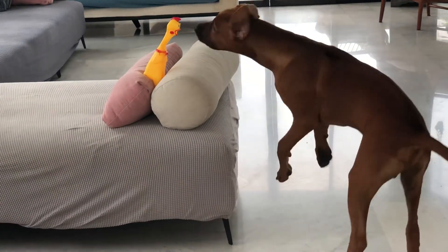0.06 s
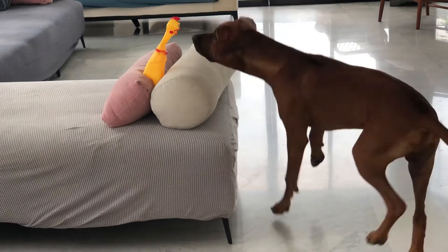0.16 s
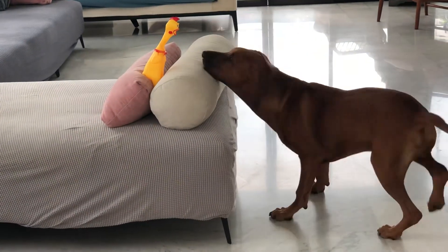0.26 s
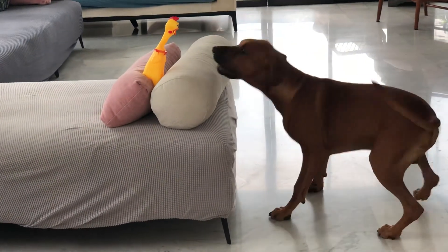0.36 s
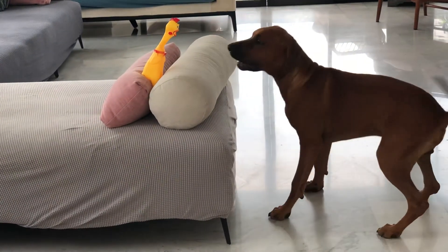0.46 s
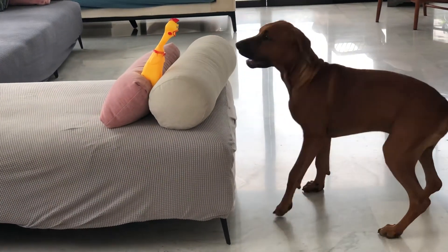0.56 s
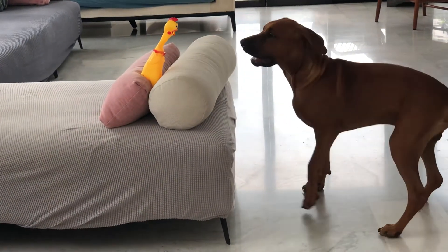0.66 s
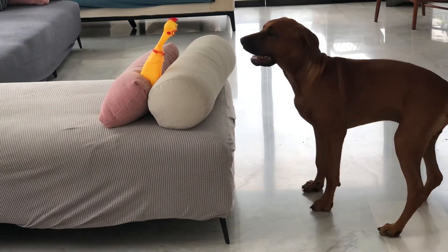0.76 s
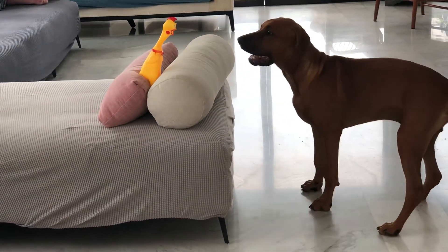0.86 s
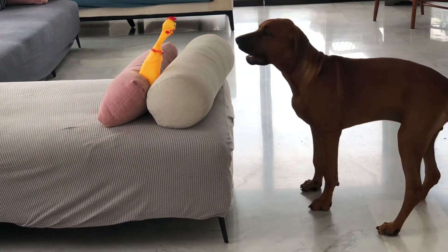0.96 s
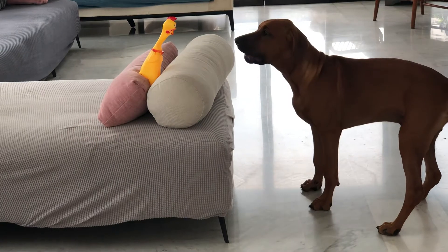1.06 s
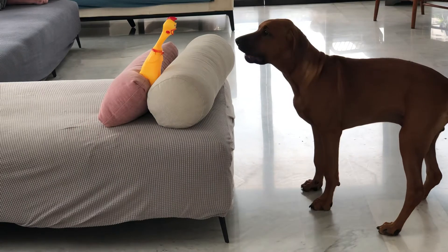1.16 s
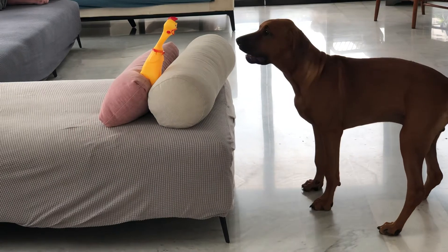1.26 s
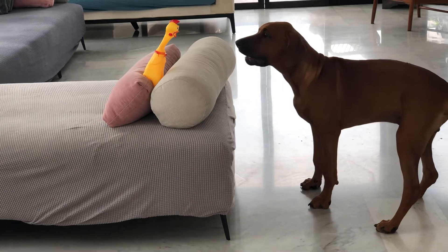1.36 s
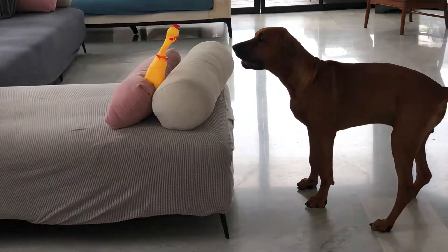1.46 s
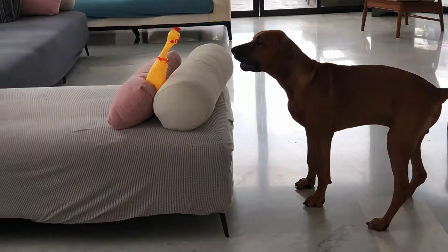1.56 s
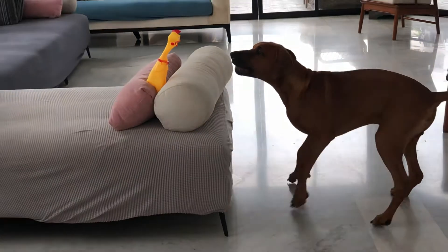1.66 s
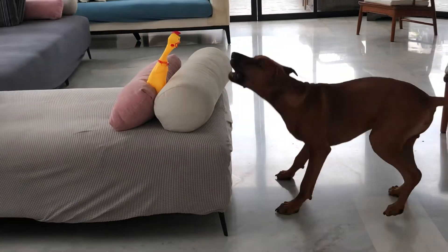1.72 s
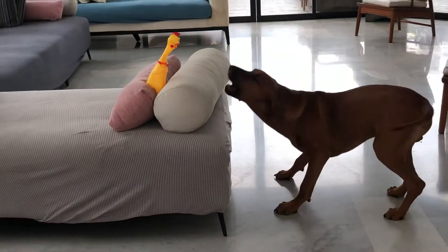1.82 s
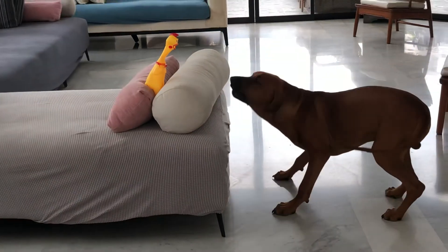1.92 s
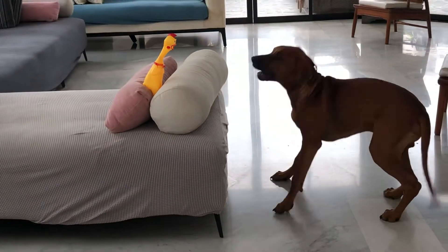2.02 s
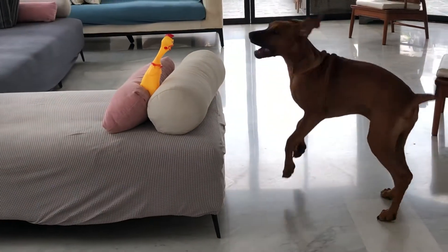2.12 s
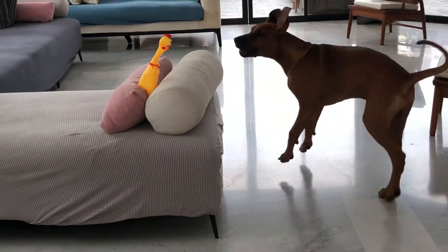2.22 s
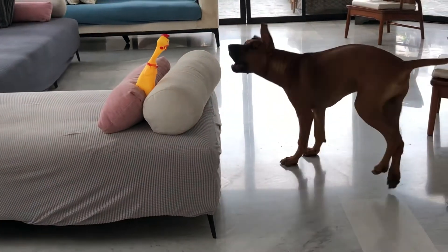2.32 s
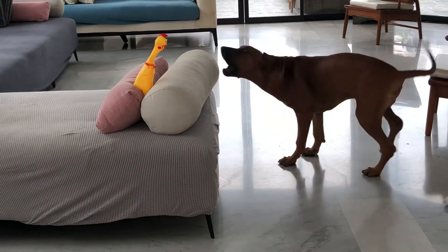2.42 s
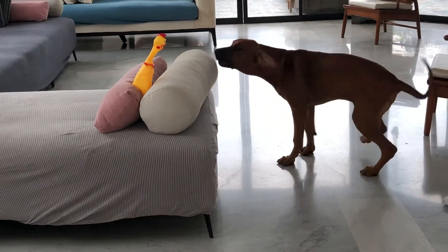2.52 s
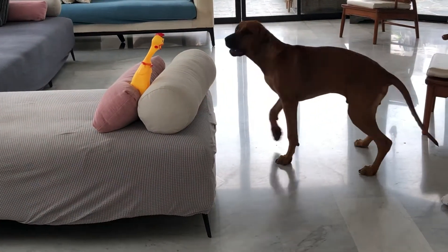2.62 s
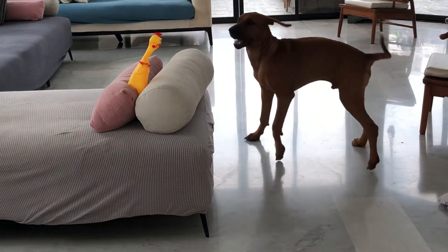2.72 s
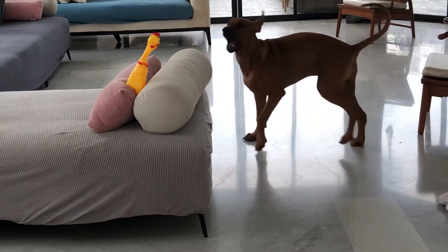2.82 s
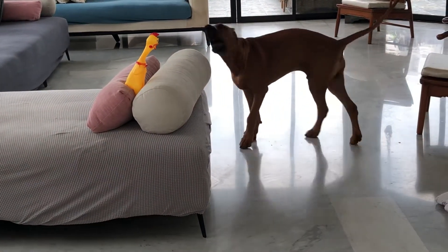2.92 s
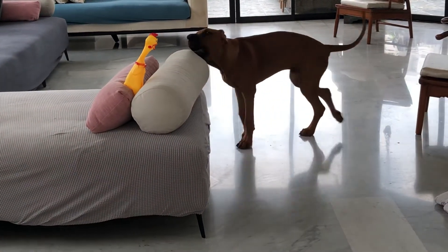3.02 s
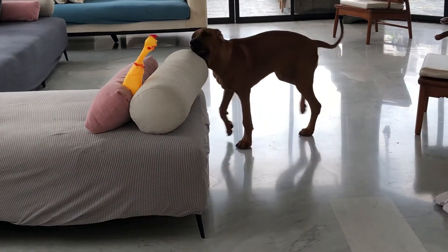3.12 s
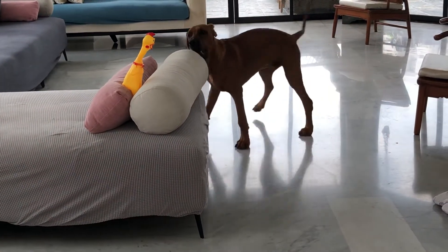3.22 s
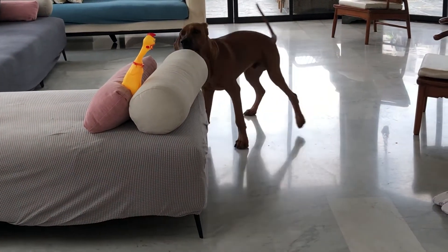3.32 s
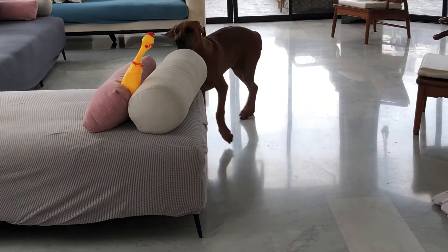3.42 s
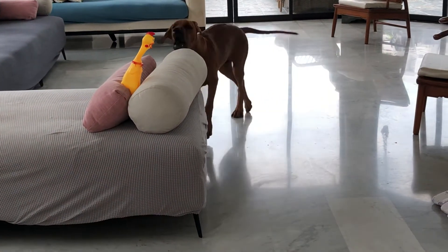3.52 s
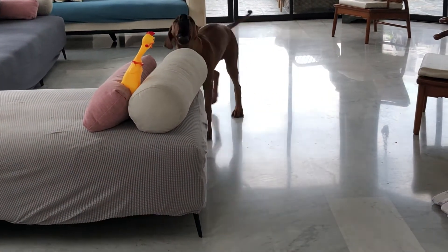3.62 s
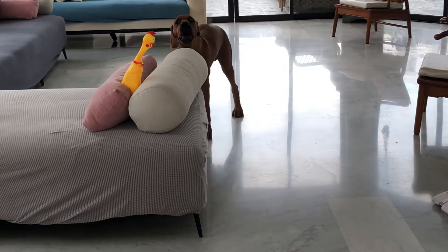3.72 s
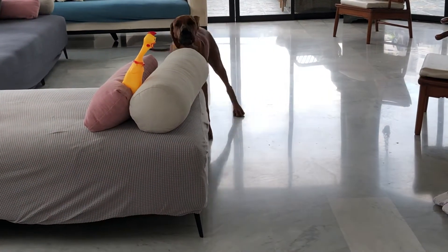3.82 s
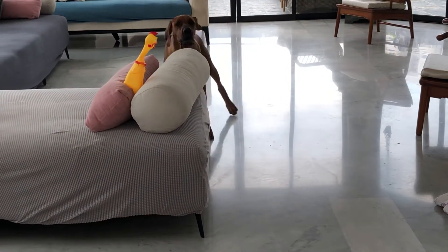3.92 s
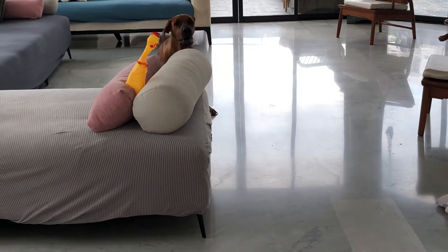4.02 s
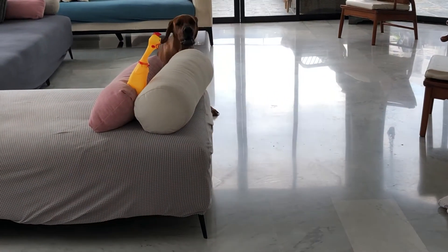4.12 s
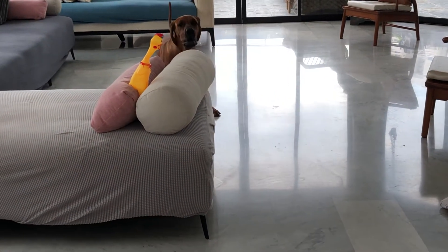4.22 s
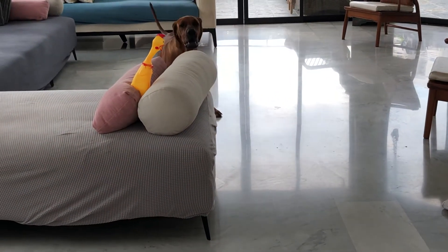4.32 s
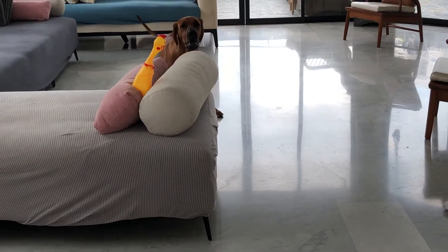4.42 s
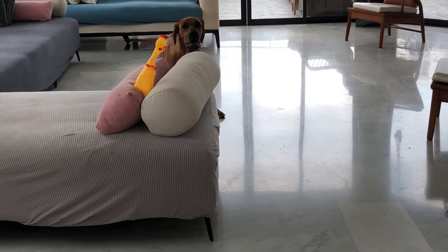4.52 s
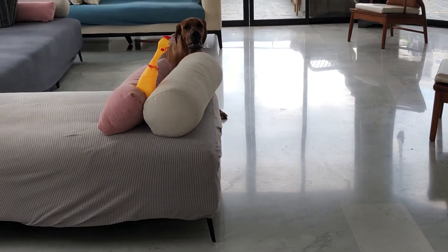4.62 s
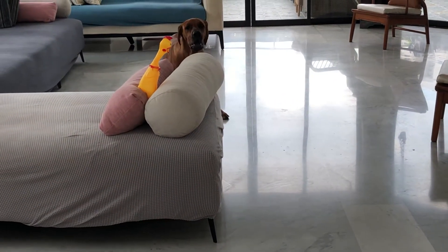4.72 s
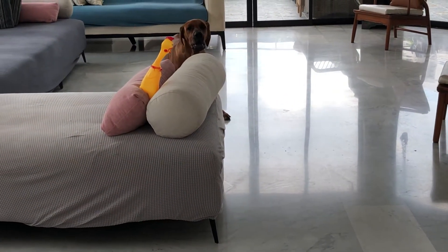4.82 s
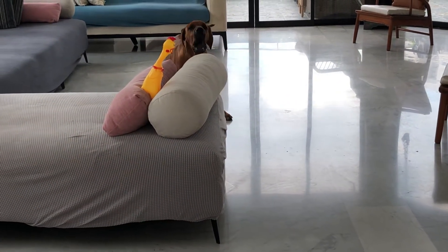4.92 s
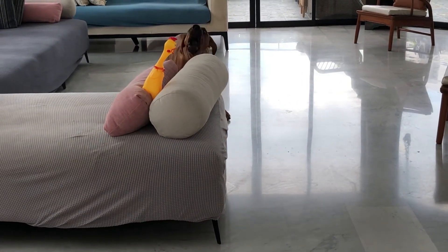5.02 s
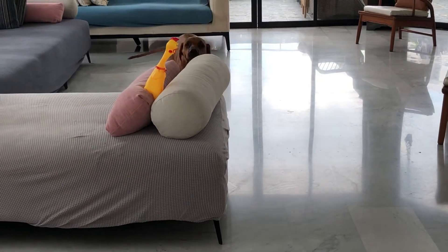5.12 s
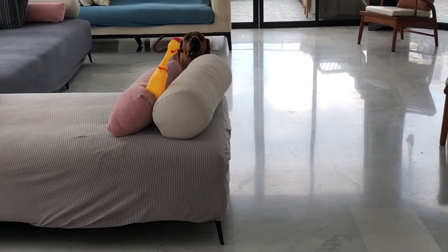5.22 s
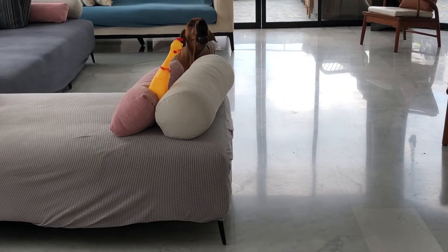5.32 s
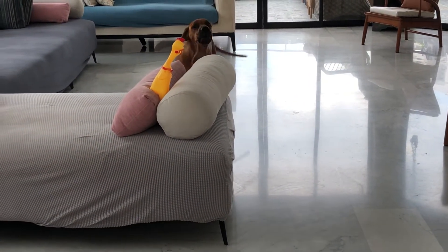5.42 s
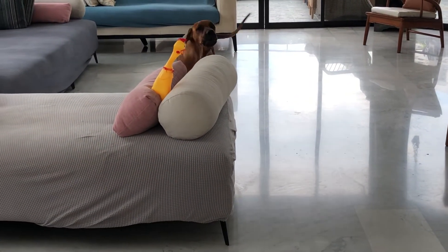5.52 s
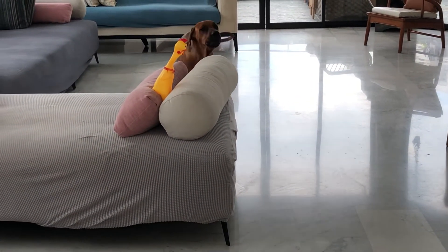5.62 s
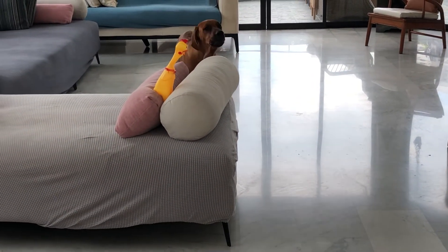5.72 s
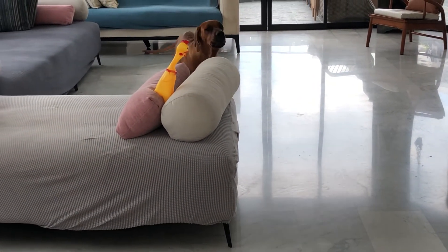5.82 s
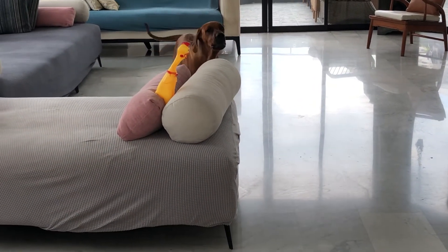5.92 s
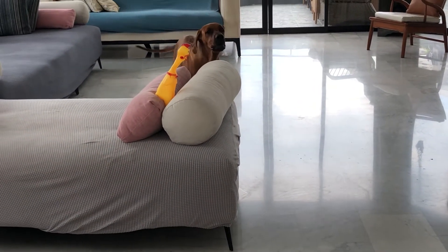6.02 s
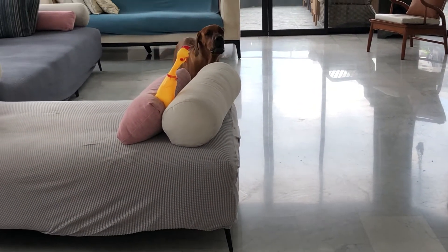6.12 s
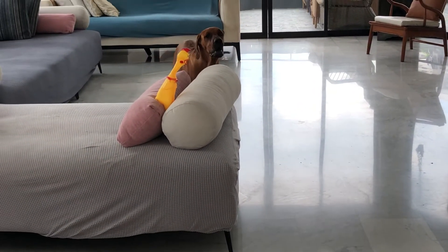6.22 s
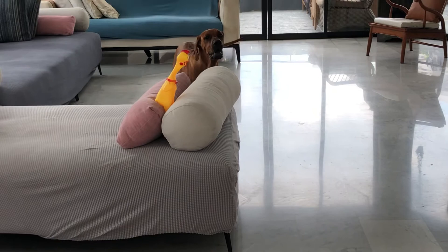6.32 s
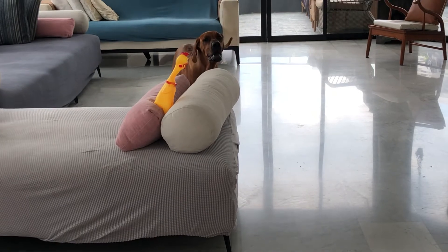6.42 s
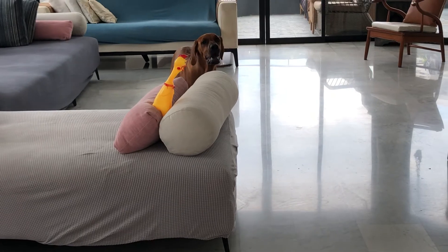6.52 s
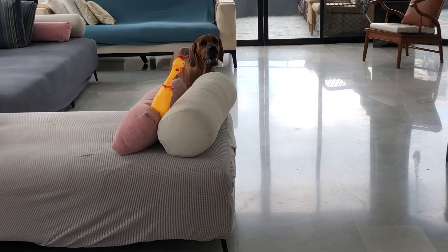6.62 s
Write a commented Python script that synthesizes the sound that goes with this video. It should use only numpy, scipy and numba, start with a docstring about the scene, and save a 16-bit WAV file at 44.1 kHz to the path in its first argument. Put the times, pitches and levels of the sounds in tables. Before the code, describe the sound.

Six loud, rough barks from a big dog ring through a room, after a faint whine and light claw clicks.

```python
"""A large dog barks six times in a living room with a bare stone floor.
Each bark follows the source-filter principle: rough glottal pulses and rushing air, arching in pitch,
excite the resonances of throat and mouth. The dog whines faintly first, and its claws tick as it hops.
The room reverberates for almost a second over the soft rumble of the house,
and a phone's gain control and limiter flatten the loud peaks."""
import sys
import numpy as np
from scipy import signal
from scipy.fft import rfft, irfft, next_fast_len
from scipy.io import wavfile
from scipy.ndimage import uniform_filter1d, minimum_filter1d
from numba import njit

SR = 44100
rng = np.random.default_rng(int(sys.argv[2]) if len(sys.argv) > 2 else 0)


def wav_record(signal):
    """Record a signal, one row per channel, as 16-bit PCM in the file named by sys.argv[1]."""
    frames = np.transpose(np.atleast_2d(signal))
    bounded = np.clip(frames, -1, 1)
    # unit amplitude maps onto the largest positive 16-bit level
    quanta = np.round(bounded * 32767).astype(np.int16)
    wavfile.write(sys.argv[1], SR, quanta)


N = 293706
T = np.arange(N) / SR

# spectral density of the house rumble: frequency_hz, relative_db
RUMBLE_SPECTRUM = [(15, -34), (25, -15.5), (91, -3), (156, -5), (193, -3.5), (227, -5), (281, -7),
                   (349, -6), (410, -12), (469, -7.5), (523, -15), (567, -11), (666, -16), (970, -13.5),
                   (15500, -52.5)]
# reverberation time of the room: frequency_hz, t60_s
ROOM_DECAY = [(150, 1), (400, 0.78), (1000, 0.84), (2200, 0.81), (5000, 0.8), (8000, 0.5), (14000, 0.3)]
# standing waves of the room: frequency_hz, relative_db, t60_s
ROOM_MODES = [(290, -41, 0.92), (422, -8.5, 0.63), (499.4, -8, 0.92), (805, -15, 1.11), (897, -25, 0.2),
              (1232, -19.5, 1.1), (1710, -20, 0.5)]
# claw impacts on stone: start_s, relative_peak_db, ring_hz, scuff_decay_s
CLAW_IMPACTS = [(0.066, -26.5, 5660, 0.00073), (.163, -43, 12000, .003), (.182, -45, 12000, .004),
                (0.199, -35, 6340, 0.0048), (.218, -41, 13000, 0.01), (0.275, -38, 8500, 0.0024),
                (.553, -39.5, 5370, 0.0037), (1.643, -42, 12000, .002), (1.651, -33.5, 5800, 0.0025),
                (1.658, -37.5, 5200, 0.023), (2.026, -39.5, 10100, 0.023), (2.061, -34.5, 8600, 0.05),
                (2.109, -37, 8850, 0.018), (2.329, -37, 6320, 0.014), (3.968, -41, 9140, 0.01),
                (3.989, -35, 8000, 0.033)]
# response of the nasal passage: frequency_hz, gain_db
NASAL_RESPONSE = [(600, -15), (1250, 7.5), (1900, 4), (2500, -8), (3200, -2), (4400, -2.5), (5700, -9),
                  (8500, -20), (12000, -37)]
# rasp of air past the teeth: frequency_hz, gain_db
RASP_SPECTRUM = [(1500, -10), (2550, -7), (3300, 0), (3700, -5), (3950, 4), (4400, -6), (5050, 2),
                 (5500, -4), (5950, 3), (6500, -4), (7200, -4), (8000, -10), (11000, -9), (15500, -15)]
# one row per bark: start_s, length_s, attack_s, effort_db, sag_db, opening_hz, top_hz, leap_at_s,
# rasp_db, chest_db, muffle_db
BARKS = [ (1.695, .200, 0.046, -2, 6.3, 266.1, 432.4, .036, -18.5, -11.5, 17.5),
         (2.351, 0.19, 0.03, -1, 12.8, 280.4, 441, .045, -18.5, -23.5, 4.5),
         (2.922, .190, 0.042, -4, 9.5, 255.9, 422.4, 0.042, -20.5, -22, 4.1),
         (3.565, .220, 0.065, -2.5, 11.7, 240.2, 417.7, .080, -16, -20.5, 1.4),
         (4.934, .195, 0.022, -3, 5.1, 265.1, 402.5, .050, -18.5, -22, 4.2),
         (5.234, 0.16, 0.029, -5.5, 7.2, 252.3, 372.2, 0.075, -18.5, -19.5, 4.2), ]
# four vocal tract resonances per bark, each: centre_hz, level_db
FORMANTS = [
    [(460, -3), (700, 2), (1110, -3), (1930, -14)],
    [(480, -0.5), (810, 3), (1500, -2.5), (2130, -10.5)],
    [(480, 0), (730, 1), (1340, -8), (2080, -10)],
    [(460, -1), (780, 2), (1330, -5), (2060, -10)],
    [(460, -1), (780, 1), (1200, -6), (2090, -13)],
    [(480, 2.5), (730, 0), (1160, -3), (2050, -17)],
]
# one entry per formant: stage_width_hz
FORMANT_WIDTHS = [190, 220, 310, 250]
# voice quality per bark, as fractions: rough_start, rough_end, alternate_loss, mouth_rise
VOICE_QUALITIES = [(.22, .38, .2, .13), (.14, .55, .25, -.03), (.25, .42, .2, .1), (.58, .6, .35, .08),
                   (.42, .33, .3, .16), (.38, .7, .4, .17)]

RELEASE_S = 0.0426  # the end of each bark, where effort and pitch give out


def undb(db):
    """Amplitude ratio of a level in decibels."""
    return 10 ** (np.asarray(db) / 20)


def unit(x):
    """Normalisation to an rms of 1."""
    return x / np.sqrt(np.mean(x ** 2) + 1e-18)


def along(hz, points):
    """Interpolation of (frequency_hz, value) points on a logarithmic frequency axis."""
    point_hz, value = np.transpose(points)
    return np.interp(np.log(hz + 1e-9), np.log(point_hz), value)


def colour(x, points):
    """Spectral filtering by a curve of (frequency_hz, gain_db) points."""
    size = next_fast_len(len(x))
    gain = undb(along(np.fft.rfftfreq(size, 1 / SR), points))
    return irfft(rfft(x, size) * gain, size)[:len(x)]


def wander(t, rate_hz):
    """Random modulation: straight lines between Gaussian values of unit spread."""
    knots = rng.standard_normal(4096)
    return np.interp((t - t[0]) * rate_hz, np.arange(len(knots)), knots)


@njit
def bandpass(x, hz, width_hz):
    """Second-order state-variable resonator with unity gain at its moving centre."""
    y, band_state, low_state = np.empty(len(x)), 0., 0.
    for i in range(len(x)):
        tuning, damping = np.tan(np.pi * min(hz[i], .45 * SR) / SR), width_hz / hz[i]
        band = (band_state + tuning * (x[i] - low_state)) / (1 + tuning * (tuning + damping))
        band_state = 2 * band - band_state
        low_state += 2 * tuning * band
        y[i] = damping * band
    return y


def resonate(x, hz, width_hz):
    """Two resonators in cascade give a peak with steep skirts."""
    centre_hz = hz * np.ones(len(x))
    return bandpass(bandpass(x, centre_hz, float(width_hz)), centre_hz, float(width_hz))


@njit
def follow(x, attack_s, release_s):
    """First-order envelope follower with separate time constants for rise and fall."""
    y, level = np.empty(len(x)), 0.
    for i in range(len(x)):
        level += (x[i] - level) / (1 + SR * (attack_s if x[i] > level else release_s))
        y[i] = level
    return y


def add(out, start_s, sound):
    """Superposition of a sound on out, from start_s onward."""
    i = max(int(start_s * SR), 0)
    out[i:i + len(sound)] += sound[:len(out) - i]


def swell(t, attack_s, release_s, onset_db, release_db):
    """Exponential attack and release, in dB relative to the held level."""
    attack = np.clip(1 - t / attack_s, 0, 1)
    release = np.clip(1 - (t[-1] - t) / release_s, 0, 1)
    return onset_db * attack + release_db * release


def background(rumble_db=-43.5, drone_db=-50):
    """Filtered noise: a broad band is the rumble of the house, a narrow band a wavering drone."""
    sway_db = .4 * wander(T, rate_hz=5)
    rumble = unit(colour(rng.standard_normal(N), RUMBLE_SPECTRUM))
    drone = unit(resonate(rng.standard_normal(N), hz=196.9, width_hz=8.4))
    return undb(rumble_db + sway_db) * rumble + undb(drone_db) * drone


def room(x, direct_db=-5, tail_db=-3, build_s=.014, floor_delay_s=.0026, floor_share=.4):
    """Convolution with the room response: direct path, floor reflection, diffuse tail and modes."""
    t = T[:65536]
    spectrum, bin_hz = rfft(rng.standard_normal(len(t))), np.fft.rfftfreq(len(t), 1 / SR)
    centres_hz = np.geomspace(100, 16000, 12)
    tail = 0
    for hz, weights in zip(centres_hz, np.eye(len(centres_hz))):
        band = irfft(spectrum * along(bin_hz, np.column_stack([centres_hz, weights])))
        tail += band * np.exp(-np.log(1000) * t / along(hz, ROOM_DECAY))
    tail *= 1 - np.exp(-t / build_s)
    response = undb(tail_db) * tail / np.sqrt(np.sum(tail ** 2))
    mode_gain = undb(-3) * 200 / SR
    for hz, relative_db, t60_s in ROOM_MODES:
        mode = np.sin(2 * np.pi * (hz * t + rng.random())) * np.exp(-np.log(1000) * t / t60_s)
        response += mode_gain * undb(relative_db) * mode
    response[0] += undb(direct_db)
    response[int(floor_delay_s * SR)] += undb(direct_db) * floor_share
    return signal.fftconvolve(x, response)[:N]


def claws():
    """Impact and friction: each claw excites a broad, bright resonance that fades as it scuffs."""
    out, t = np.zeros(N), T[:4096]
    for start_s, peak_db, ring_hz, decay_s in CLAW_IMPACTS:
        scuff = rng.standard_normal(len(t)) * np.exp(-t / decay_s)
        tick = resonate(scuff, ring_hz, width_hz=1.26 * ring_hz)
        add(out, start_s, undb(peak_db) * tick / np.abs(tick).max())
    return out


def glottis(t, hz, roughness, alternate_loss, jitter=.06, shimmer_db=5, breath=1.25):
    """Phonation: a pulse and a puff of air per cycle; weaker alternate pulses add a subharmonic."""
    cycles = np.cumsum(hz * (1 + jitter * roughness * wander(t, rate_hz=354.6))) / SR
    closures = np.flatnonzero(np.diff(np.floor(cycles))) + 1
    shimmer = undb(shimmer_db * roughness * wander(t, rate_hz=309.7))
    strength = (1 - alternate_loss * (np.floor(cycles) % 2)) * shimmer
    # each pulse is shared between the two samples around the closure
    late = np.clip(cycles[closures] % 1 * SR / hz[closures], 0, 1)
    pulses = np.zeros(len(t))
    pulses[closures - 1] = strength[closures] * late
    pulses[closures] = strength[closures] * (1 - late)
    airflow = 0.25 + np.exp(-(cycles % 1) / 0.36)
    puffs = rng.standard_normal(SR)[:len(t)] * airflow
    return unit(pulses - pulses.mean()) * np.sqrt(1 - roughness ** 2) + breath * roughness * unit(puffs)


def whine(length_s=0.187, top_hz=634, droop=0.0337, level_db=-50):
    """Nasal filtering of nearly periodic pulses gives a thin note, slightly lower at both ends."""
    t = np.arange(int(length_s * SR)) / SR
    pitch_hz = top_hz * (1 - droop * (2 * t / length_s - 1) ** 2)
    source = glottis(t, pitch_hz, roughness=0.1, alternate_loss=0.75)
    swell_db = swell(t, attack_s=0.034, release_s=0.093, onset_db=-15, release_db=-28)
    return unit(colour(source, NASAL_RESPONSE)) * undb(level_db + swell_db)


def gulp(length_s=0.03, level_db=-29):
    """A puff of noise excites a throat resonance as the jaws part for the first bark."""
    air = rng.standard_normal(SR)[:int(length_s * SR)]
    puff = unit(resonate(air, hz=730, width_hz=260))
    return undb(level_db) * puff * np.hanning(len(puff))


def pitch_arch(t, opening_hz, top_hz, leap_at_s, leap_s=.02152, creep_hz_per_s=330, drop=.125):
    """The fundamental leaps from a growl, creeps to its top and drops as the effort gives out."""
    leap = (1 + np.tanh((t - leap_at_s) / leap_s)) / 2
    past_top_s = t - (t[-1] - RELEASE_S)
    high_hz = top_hz + creep_hz_per_s * np.minimum(past_top_s, 0)
    fall = 1 - drop * np.maximum(past_top_s, 0) / RELEASE_S
    return (opening_hz + (high_hz - opening_hz) * leap) * fall


def vocal_tract(source, formants, gape, mouth_rise, muffle_db, edge_hz=2255):
    """Formant filtering: a wide gape shifts and brightens the resonances; closing lips darken them."""
    rises = [.08, .03, mouth_rise, .05]
    gape_tilts_db, lip_tilts = np.linspace(-4, 4, num=4), [.5, -.5, -1, -1]
    bands = []
    for i, (hz, level_db) in enumerate(formants):
        band = unit(resonate(source, hz * (1 + rises[i] * gape), FORMANT_WIDTHS[i]))
        bands.append(undb(level_db + gape_tilts_db[i] * gape + lip_tilts[i] * muffle_db) * band)
    voice = sum(bands[1:]) - bands[0]  # the lowest in antiphase keeps the valley above it shallow
    # side branches of the throat shut off everything above the last resonance
    return signal.sosfilt(signal.butter(14, edge_hz, fs=SR, output="sos"), voice)


def rasp(source, air, level_db):
    """Turbulence: air rushes past the teeth in uneven spits."""
    spits_db = 4 * wander(T[:len(air)], rate_hz=90)
    return undb(level_db + spits_db) * unit(colour(unit(source) + 5.2 * air, RASP_SPECTRUM))


def chest(source, air, gape, boom_db, fade_db=-8, push_db=-28):
    """Chest resonance: a boom that fades as the gape narrows, above a still lower push of air."""
    boom = unit(resonate(source + air, hz=292, width_hz=125))
    push = unit(resonate(air, hz=170, width_hz=340))
    return undb(boom_db + fade_db * (0.5 - gape)) * boom + undb(push_db) * push


def bark(row, formants, quality, closing_at_s=0.078, rasp_growth=0.29, rasp_fade_db=-13):
    """Source and filter: the glottis drives tract, rasp and chest as effort swells, sags and ends."""
    _, length_s, attack_s, effort_db, sag_db, opening_hz, top_hz, leap_at_s = row[:8]
    rasp_db, chest_db, muffle_db = row[8:]
    rough_start, rough_end, alternate_loss, mouth_rise = quality
    t = np.arange(int(length_s * SR)) / SR
    sag = np.interp(t, [attack_s, length_s - RELEASE_S], [0, 1])
    swell_db = swell(t, attack_s, RELEASE_S, onset_db=-20, release_db=-2.5)
    envelope = undb(effort_db - sag_db * sag + swell_db) * signal.windows.tukey(len(t), .08)
    gape = np.interp(t, [.04, .09], [1, 0])
    closing = np.interp(t, [closing_at_s, length_s - RELEASE_S], [0, 1])
    roughness = np.interp(t, [0, .025, .06, .13], [.6, rough_start, rough_start, rough_end])
    source = glottis(t, pitch_arch(t, opening_hz, top_hz, leap_at_s), roughness, alternate_loss)
    air = rng.standard_normal(SR)[:len(t)]
    voice = vocal_tract(source, formants, gape, mouth_rise, muffle_db * closing)
    hiss = rasp(source, air, rasp_db + rasp_growth * swell_db + rasp_fade_db * closing)
    return (voice + hiss + chest(source, air, gape, chest_db)) * envelope


def scene(claw_room_db=-3, claw_direct_db=-10):
    """Superposition of dog, room and background; the claws have a larger share of direct sound."""
    dog = np.zeros(N)
    add(dog, start_s=1.658, sound=gulp())
    ticks = claws()
    add(dog, start_s=.892, sound=whine())
    for row, formants, quality in zip(BARKS, FORMANTS, VOICE_QUALITIES):
        add(dog, start_s=row[0], sound=bark(row, formants, quality))
    reverberant = room(dog + undb(claw_room_db) * ticks)
    return (reverberant + undb(claw_direct_db) * ticks + background())[None]


def record(dry, knee_db=-16, slope=0.28, ceiling=.93, window_samples=89, cutoff_hz=15850):
    """Dynamic range compression: slow gain control and a quick look-ahead limiter, then a low-pass."""
    loudness = follow(np.abs(dry[0]), attack_s=0.052, release_s=0.74)
    compressed = dry[0] * np.maximum(loudness / undb(knee_db), 1) ** -slope
    peaks = -minimum_filter1d(-np.abs(compressed), size=window_samples)
    gain = ceiling / np.maximum(follow(peaks, attack_s=0., release_s=0.012), ceiling)
    limited = compressed * uniform_filter1d(gain, size=window_samples)
    return signal.sosfilt(signal.ellip(10, .1, 80, cutoff_hz, fs=SR, output="sos"), limited)[None]


dry = scene()
out = record(dry)
wav_record(out)
```